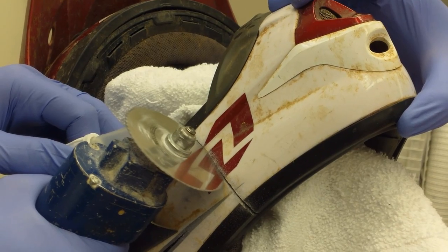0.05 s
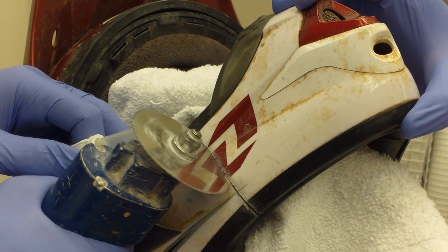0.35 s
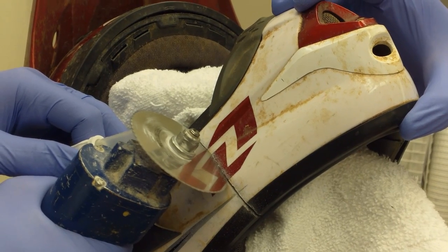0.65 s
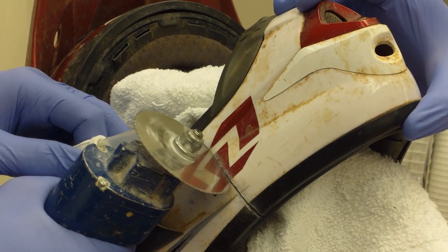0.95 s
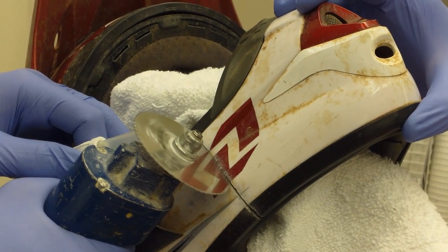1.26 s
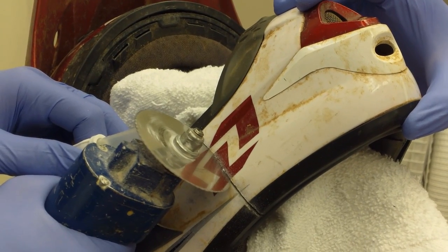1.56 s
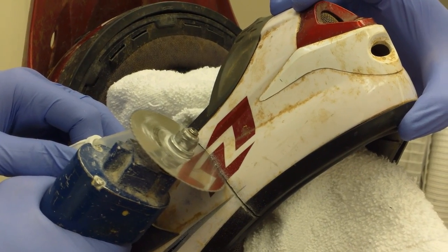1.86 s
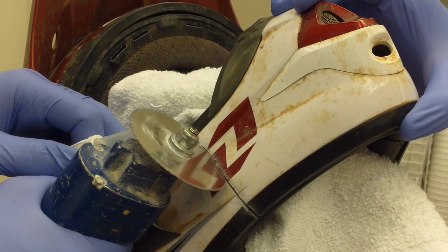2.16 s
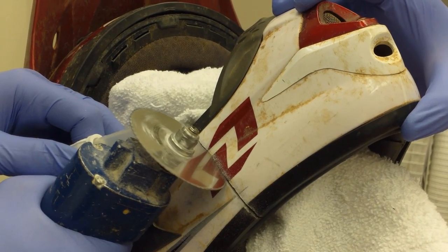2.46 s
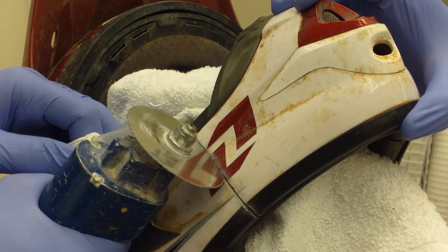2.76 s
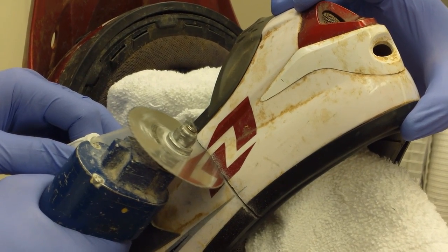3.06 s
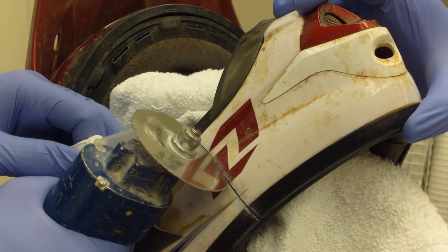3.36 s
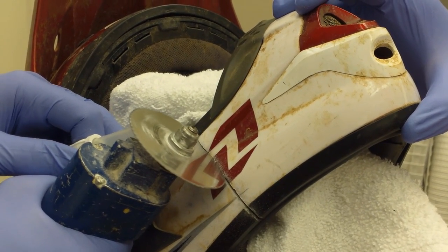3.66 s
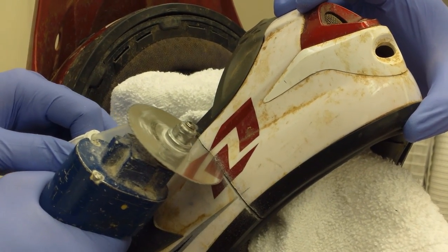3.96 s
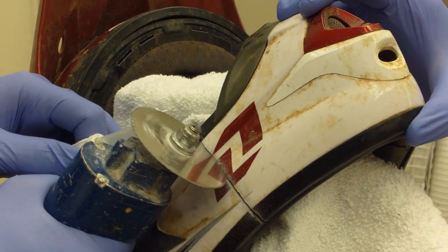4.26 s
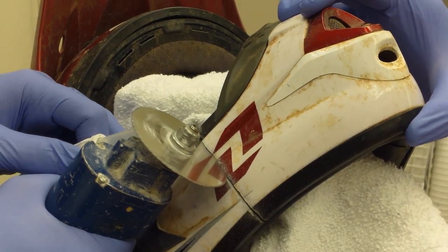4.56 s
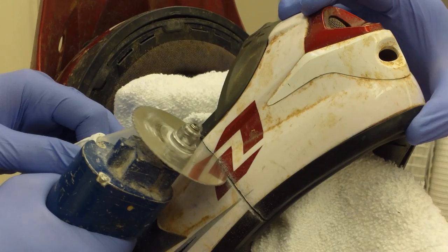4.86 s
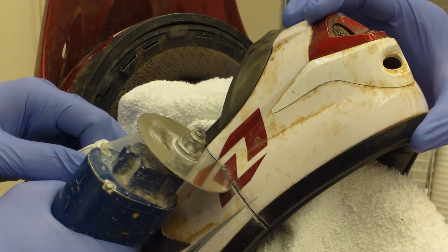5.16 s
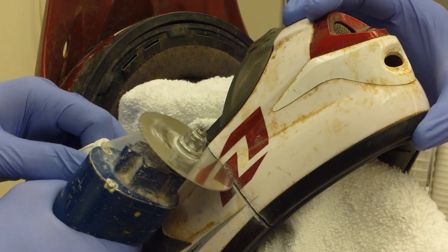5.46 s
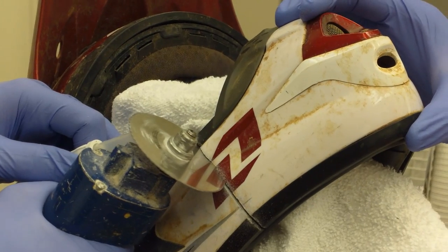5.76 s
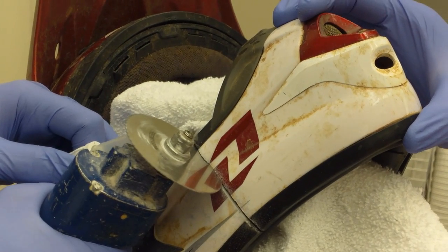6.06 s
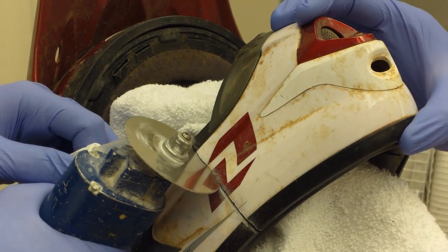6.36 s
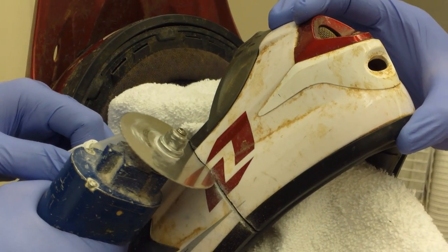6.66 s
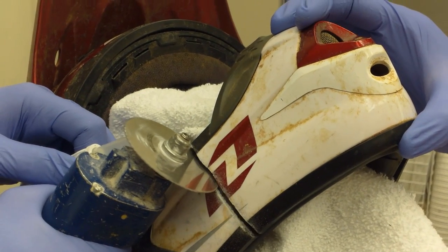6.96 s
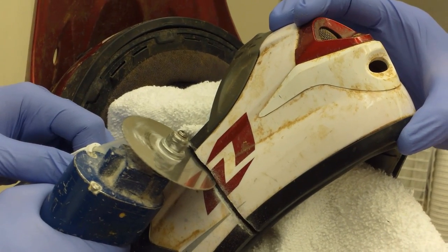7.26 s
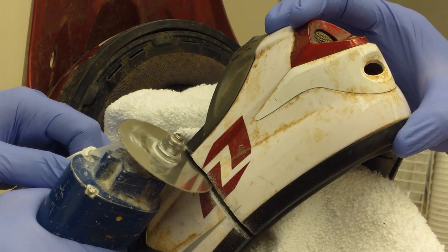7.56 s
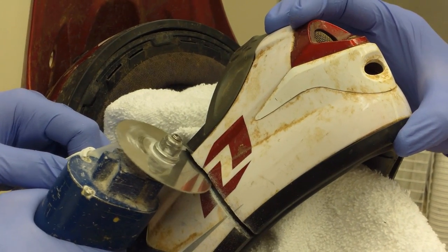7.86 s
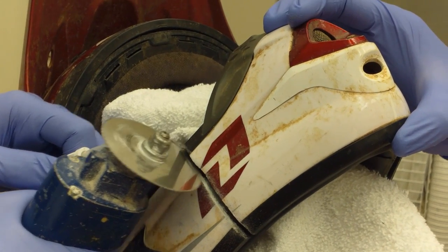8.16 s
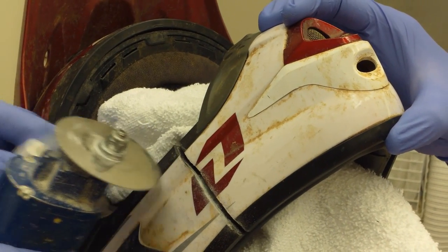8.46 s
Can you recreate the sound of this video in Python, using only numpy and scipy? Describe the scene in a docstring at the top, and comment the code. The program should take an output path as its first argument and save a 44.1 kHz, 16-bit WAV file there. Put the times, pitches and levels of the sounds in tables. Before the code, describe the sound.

A small electric saw whines steadily as its thin steel disc rasps through a hard plastic shell, squealing now and then.

```python
"""A small room, the microphone close to a small electric saw cutting through a hard plastic shell.
The thin steel disc knocks on the cut once a turn, which makes a whine and sets the shell droning.
Its teeth rasp, the chips hiss, and the steel rings and now and then squeals where it binds.
The motor sags under load and speeds up as the disc comes free; near the end the hand bumps the saw.
Mains hum and the low rumble of the room lie underneath."""
import sys
import numpy as np
from scipy import signal
from scipy.fft import rfft, irfft
from scipy.io import wavfile
from scipy.ndimage import uniform_filter1d

SR = 44100
rng = np.random.default_rng(int(sys.argv[2]) if len(sys.argv) > 2 else 0)


def wav_out(sig):
    """Save sig, one row per channel (or a flat mono array), as 16-bit PCM at SR to the path in sys.argv[1]."""
    wavfile.write(sys.argv[1], SR, np.round(np.clip(np.atleast_2d(sig).T, -1, 1) * 32767).astype(np.int16))


N = 383669
TIME = np.arange(N) / SR
STEPS = TIME[::64]  # slow controls live on this coarser grid

# The room's rumble. Each row: frequency in Hz, relative level in dB.
RUMBLE_COLOUR = [(20, 4), (45, -1.5), (90, -9), (180, -35), (400, -9), (1500, -29)]
# The hand shifts its hold. Each row: centre in seconds, half-length in seconds, level in dB.
HAND_BUMPS = [(8.08, .05, -53), (8.25, 0.065, -51), (8.58, .04, -54)]
# Speed of the shaft. Each row: time in seconds, turns a second.
SHAFT_SPEED = [(0.0, 299.9), (0.22, 298.1), (2.35, 297.0), (2.59, 296.2), (3.56, 296.6), (3.83, 297.9),
               (4.38, 306.2), (4.56, 304.8), (4.94, 296.7), (5.4, 292.3), (5.77, 290.6), (6.3, 296.7),
               (6.54, 297.2), (6.69, 296.6), (7.17, 299.5), (7.46, 309.6), (8.0, 315.7), (8.7, 320.6)]
# How firmly the disc bites. Each row: time in seconds, bite in dB (0 is firm, lower is freer).
DISC_BITE = [(0, 0), (.75, -0.4), (1.15, 0.8), (1.62, 0.8), (1.75, -1.8), (2.15, -2), (2.5, -0.14),
             (3.55, -1.9), (3.8, -2.1), (4.1, -1.5), (4.75, -1.4), (5.2, -0.8), (5.7, 0.1), (5.98, -2),
             (6.62, -1.4), (7.1, -3.2), (7.4, -6.5), (8.7, -6)]
# The motor's fundamental and its octave. Each row: time in seconds, level in dB.
MOTOR_FUNDAMENTAL = [(0.0, -38), (2.01, -47.5), (3.2, -45), (3.58, -51), (4.07, -36), (4.84, -36.5),
                     (5.28, -63), (5.43, -44), (6.18, -50), (6.37, -42), (7.22, -39.5), (7.34, -47),
                     (8.65, -50.5), (8.7, -54)]
MOTOR_OCTAVE = [(0.0, -43), (0.56, -47), (3.71, -47.5), (3.78, -56), (4.41, -39), (5.99, -42), (6.23, -36),
                (7.03, -39), (7.22, -52.5), (8.7, -41)]
# Shell resonances, each fed by one shaft order. Each row: order, frequency in Hz, width in Hz,
# level in dB at a firm bite, dB per dB of bite, dB per second of cutting, sway in dB.
DRONE_MODES = [(4, 1188, 110, -30, 3, 0.38, 2.5), (5, 1490, 190, -39, 0.04, -0.58, 1),
               (6, 1790, 79, -32.5, .5, -0.7, 2), (14, 4160, 160, -29, -0.05, -0.16, 1.6)]
# The disc skips in the cut. Each row: centre in seconds, half-length in seconds, dip in dB.
DISC_SKIPS = [(3.284, 0.026, 3), (4.04, 0.019, 20), (6.723, 0.011, 19)]
# Colour of the other shaft orders. Each row: frequency in Hz, relative level in dB.
WHINE_COLOUR = [(900, -42), (2100, -40.5), (3000, -37), (3300, -42), (3900, -34), (4500, -38), (5100, -36),
                (5650, -31), (6000, -44), (7100, -38), (7600, -49.5), (8700, -37.5), (10300, -42),
                (12300, -56)]
# A shell resonance moves as the cut lengthens. Each row: time in seconds, frequency in Hz, lift in dB.
MOVING_MODE = [(0, 3000, -2.5), (1.1, 3120, 0), (1.7, 2080, 6.5), (2.7, 2050, 6.5), (3.25, 3300, 2.5),
               (3.6, 2450, 3.5), (4.3, 3100, 1.5), (5.7, 2310, 0.5), (6.2, 1990, -2), (6.6, 2000, 1),
               (6.71, 2190, 13), (6.82, 2480, 1), (7.0, 2560, 7), (7.08, 2180, 5), (7.33, 2300, -7),
               (7.5, 2380, 6), (7.85, 2950, 6.5), (8.7, 3170, 7.5)]
# Noise of the shell, the teeth and the chips. Each row: frequency in Hz, relative level in dB.
RATTLE_COLOUR = [(150, -17), (420, -2), (650, 0), (880, 10.5), (1200, 8), (1600, 1.5), (2200, -17.5),
                 (3200, 1.5), (6000, -51)]
RASP_COLOUR = [(700, -38.5), (1500, -12), (2100, -3.5), (2900, -5), (3400, -4.5), (4000, 3), (4600, 4),
               (5400, 0.5), (6500, -9.5), (9000, -46.5)]
HISS_COLOUR = [(3500, -21), (5600, -5.5), (6300, -1.5), (7100, -2.5), (7600, -6.5), (8300, 1.5),
               (9400, 2.5), (10200, -1), (11200, -7.5), (12300, -6.5), (13300, -10.5), (14600, 0),
               (15400, -7), (15700, -1.5)]
# Stick-slip of disc and shell. Each row: start and end in seconds, nominal pitch in Hz, level in dB.
STICK_SLIPS = [(0, .36, 5085, -33), (0.45, 0.567, 3573, -27), (.474, .81, 6560, -27),
               (.476, .817, 5358, -27), (.48, 1.1, 8925, -30), (1.11, 1.703, 1487, -32),
               (1.3, 3.5, 11580, -40), (1.92, 2.3, 1782, -32), (3.0, 3.6, 1782, -33),
               (3.33, 3.784, 1483, -30), (3.4, 3.9, 4160, -32), (3.78, 4.135, 1795, -26),
               (3.853, 3.951, 3575, -26.5), (4.205, 4.95, 1820, -31), (4.457, 4.798, 1520, -33),
               (5.285, 5.62, 5255, -20.5), (5.346, 5.802, 6110, -29), (5.503, 5.895, 2330, -33),
               (5.72, 5.9, 1455, -31), (5.93, 6.5, 4130, -31), (6.066, 6.7, 1485, -30),
               (6.15, 6.7, 1782, -30.5), (7.262, 7.37, 5160, -13.5), (7.36, 7.427, 8500, -26),
               (7.442, 7.71, 4060, -26), (7.548, 7.7, 5170, -13.5), (7.774, 7.81, 5200, -12.5),
               (7.896, 7.962, 5100, -14.5), (8.33, 8.47, 8440, -22)]
# The disc's low ring and its high ring. Each row: time in seconds, relative level in dB.
LOW_RING = [(0, -20.5), (.25, -19.5), (.75, -27), (.93, -20.5), (1.2, -22), (1.75, -21), (2.15, -23.5),
            (3.1, -21), (4.0, -19.5), (4.3, -21.5), (5.4, -19.5), (7.1, -19), (8.2, -19.5), (8.7, -16)]
HIGH_RING = [(0, -31), (2.1, -30), (3.0, -26.5), (3.7, -28), (4.15, -23), (4.5, -24), (4.8, -30),
             (6.0, -27), (6.65, -30), (7.4, -22), (8.2, -21), (8.42, -24), (8.7, -20)]

HUM_HZ = 120
LOW_MODE_HZ, LOW_RISE_HZ_PER_S = 5105, 7  # the disc's low mode rises as the cut lengthens
HIGH_MODE_HZ, HIGH_SHIFT_HZ_PER_DB = 14540, 42  # its high mode stiffens with the bite


def amp(db):
    """Decibels to gain."""
    return 10 ** (np.asarray(db) / 20)


def unit_rms(x):
    """Scales to rms 1."""
    return x / np.sqrt(np.mean(x ** 2) + 1e-20)


def curves(rows):
    """Each column of a table, joined by straight lines in time."""
    seconds, *columns = np.transpose(rows)
    return [np.interp(TIME, seconds, column) for column in columns]


def sway(hz):
    """Slow random motion of rms 1 on the coarse grid, rolling off above hz."""
    f = np.fft.rfftfreq(8192, STEPS[1])
    slow = irfft(rfft(rng.standard_normal(8192)) / (1 + (f / hz) ** 4))
    return unit_rms(slow[:len(STEPS)])


def wander(hz):
    """A sway drawn out to every sample."""
    return np.interp(TIME, STEPS, sway(hz))


def spectrum(points, f):
    """Reads a colour in dB at the frequencies f."""
    hz, db = np.transpose(points)
    return np.interp(np.log(f + 1), np.log(hz), db)


def colour(x, points):
    """A causal filter with the given spectrum; the result has rms 1."""
    log_gain = np.log(amp(spectrum(points, abs(np.fft.fftfreq(4096, 1 / SR)))))
    taps = np.fft.ifft(np.exp(np.conj(signal.hilbert(log_gain)))).real  # minimum phase
    return unit_rms(signal.oaconvolve(x, taps[:len(taps) // 2])[:N])


def resonate(x, hz, width_hz):
    """A resonance that follows the curve hz; the result has rms 1."""
    carrier = np.exp(2j * np.pi * np.cumsum(hz) / SR)
    pole = np.exp(-np.pi * width_hz / SR)
    return unit_rms((carrier * signal.lfilter([1 - pole], [1, -pole], x / carrier)).real)


def level(bite_db, db, grip, growth=0):
    """Gain of a layer: db at a firm bite, grip dB per dB of bite, growth dB a second of cutting."""
    return amp(db + grip * bite_db + growth * TIME)


def order_angle(order, turns, twist_rad=1.2):
    """The phase of one shaft order after the shell, which delays the orders unequally."""
    return 2 * np.pi * order * turns + twist_rad * order ** 2


def room_tone(hum_db=-51.5, rumble_db=-54):
    """Behind the saw: mains hum over the low rumble of the room."""
    hum = amp(hum_db) * np.sqrt(2) * np.sin(2 * np.pi * HUM_HZ * TIME)
    return hum + amp(rumble_db) * colour(rng.standard_normal(N), RUMBLE_COLOUR)


def wall_reflections(x, t60_s=0.22):
    """Sparse reflections reach the microphone from near walls and die quickly."""
    t = TIME[:SR // 3]
    taps = rng.standard_normal(len(t)) * (rng.random(len(t)) < 2000 / SR)  # about 2000 a second
    taps *= (t > .003) * amp(-60 * t / t60_s)
    return signal.oaconvolve(x, taps / np.linalg.norm(taps))[:N]


def hand_bumps(hz=98):
    """Dull thuds of the hand on the saw."""
    size = sum(amp(db) * np.exp(-((TIME - s) / length) ** 2) for s, length, db in HAND_BUMPS)
    pitch = np.full(N, hz)
    thud = resonate(rng.standard_normal(N), pitch, width_hz=25)
    return size * resonate(thud, pitch, width_hz=60)


def motor(turns):
    """The motor's own hum: the shaft rate and its octave."""
    (fundamental_db,), (octave_db,) = curves(MOTOR_FUNDAMENTAL), curves(MOTOR_OCTAVE)
    phase = rng.random(2)
    fundamental = amp(fundamental_db) * np.cos(2 * np.pi * (turns + phase[0]))
    octave = amp(octave_db) * np.cos(2 * np.pi * (2 * turns + phase[1]))
    return np.sqrt(2) * (fundamental + octave)


def shell_drone(turns, speed_hz, bite_db):
    """Strong shaft orders swell near the shell's resonances and break off where the disc skips."""
    gap_db = sum(depth * np.exp(-((TIME - s) / length) ** 2) for s, length, depth in DISC_SKIPS)
    out = np.zeros(N)
    for order, hz, width, db, grip, growth, sway_db in DRONE_MODES:
        nearness = 1 / np.hypot(1, 2 * (round(order) * speed_hz - hz) / width)
        size = nearness * level(bite_db, db, grip, growth) * amp(sway_db * wander(3.9))
        out += size * np.cos(order_angle(round(order), turns))
    return np.sqrt(2) * amp(-gap_db) * out


def tooth_whine(turns, speed_hz, bite_db, fade_db=1.87, drift_rad=0.74, half_width_hz=240):
    """A high tooth knocks once a turn: a stack of orders that fade in and out as the contact shifts."""
    speed_hz, mode_hz, lift_db = (np.interp(STEPS, TIME, c) for c in (speed_hz, *curves(MOVING_MODE)))
    judder = 0.0066 * wander(42)  # the shaft judders, which blurs the high orders most
    angle = (2 * np.pi * turns + judder) % (2 * np.pi)
    drone_orders = [round(row[0]) for row in DRONE_MODES]
    out = np.zeros(N)
    for order in np.setdiff1d(np.arange(3, 40), drone_orders):
        hz = order * speed_hz
        resonance_db = lift_db / (1 + ((hz - mode_hz) / half_width_hz) ** 2)
        size = amp(spectrum(WHINE_COLOUR, hz) + resonance_db + fade_db * sway(4.1))
        dispersion = np.pi * 0.00703 * order ** 2  # the shell carries treble faster than bass
        phase = dispersion + drift_rad * sway(1.9)
        out += np.interp(TIME, STEPS, size) * np.cos(order * angle + np.interp(TIME, STEPS, phase))
    uneven = 1 + 0.06 * wander(84)  # no two knocks are alike
    ripple = 1 + 0.041 * np.cos(np.pi * HUM_HZ * TIME)  # mains ripple gives them side tones
    return np.sqrt(2) * out * amp(bite_db) * uneven * ripple


def squeals(turns, bite_db, waver_hz=12, flicker_db=2.2, ramp_s=0.021, lock_bite_db=-4):
    """Where the disc binds, a mode sings briefly; a firm bite pulls it onto the nearest shaft order."""
    out = np.zeros(N)
    drift = np.cumsum(waver_hz * wander(77)) / SR
    sputter_db_per_khz = 0.3573 * wander(28)  # the higher the squeal, the more easily it breaks up
    for start, end, hz, db in STICK_SLIPS:
        on = (TIME > start) & (TIME < end)
        gate = np.clip(np.minimum(TIME[on] - start, end - TIME[on]) / ramp_s, 0, 1)
        order = round(hz / (SR * np.diff(turns[on]).mean()))
        locked = bite_db[on].mean() > lock_bite_db
        angle = order_angle(order, turns[on]) if locked else 2 * np.pi * (hz * TIME[on] + drift[on])
        out[on] += amp(db + sputter_db_per_khz[on] * hz / 1000) * gate * np.sin(angle)
    return out * amp(flicker_db * wander(7.8))


def scrape(turns, once_db, twice_db, lag_turns, grit_db):
    """Noise of teeth in plastic; the disc runs out of true, so it presses once and twice a turn."""
    angle = 2 * np.pi * (turns - lag_turns)
    pressure_db = once_db * np.cos(angle) + twice_db * np.cos(2 * angle) + grit_db * wander(900)
    return amp(pressure_db) * rng.standard_normal(N)


def cutting(turns, bite_db, surge_db=0.72, surge_hz=3, rattle_sway_db=1.35):
    """The shell rattles and the teeth rasp with the bite; the chips hiss throughout."""
    shell = scrape(turns, once_db=1.2, twice_db=1, lag_turns=0.062, grit_db=0.69)
    teeth = scrape(turns, once_db=0.6, twice_db=0.29, lag_turns=-0.11, grit_db=0.45)
    chips = scrape(turns, once_db=1.3, twice_db=0.87, lag_turns=-0.09, grit_db=2.1)
    rattle = level(bite_db, db=-39.5, grip=1.0, growth=0.27) * colour(shell, RATTLE_COLOUR)
    rattle *= amp(rattle_sway_db * wander(surge_hz))
    rasp = level(bite_db, db=-25.5, grip=0.15) * colour(teeth, RASP_COLOUR)
    hiss = level(bite_db, db=-22.0, grip=-0.41, growth=-0.14) * colour(chips, HISS_COLOUR)
    return (rattle + rasp + hiss) * amp(surge_db * wander(surge_hz))


def disc_ring(turns, bite_db, low_trim_db=-1, high_trim_db=-2, low_sway_hz=45):
    """The teeth keep two modes of the steel ringing; the lower one sways with the grip of the cut."""
    (low_db,), (high_db,) = curves(LOW_RING), curves(HIGH_RING)
    low_hz = LOW_MODE_HZ + LOW_RISE_HZ_PER_S * TIME
    high_hz = HIGH_MODE_HZ + HIGH_SHIFT_HZ_PER_DB * bite_db
    drive = scrape(turns, once_db=0.62, twice_db=2.8, lag_turns=0.22, grit_db=1.8)
    free = resonate(drive, low_hz + low_sway_hz * wander(30), width_hz=150)
    free = resonate(free, low_hz, width_hz=760)
    swing = np.sqrt(abs(uniform_filter1d(free ** 2, size=700)) + 1e-6)
    free = unit_rms(free / swing ** 0.66)  # friction holds back the widest swings
    near_orders = sum(np.cos(2 * np.pi * order * turns) for order in range(16, 20))
    forced = resonate(near_orders, low_hz, width_hz=280)
    share = np.clip(0.33 * amp(bite_db) ** 2, 0, .9)  # a firm bite locks part of the ring to the shaft
    low_mode = np.sqrt(1 - share) * free + np.sqrt(share) * forced
    high_mode = resonate(resonate(drive, high_hz, width_hz=480), high_hz, width_hz=900)
    return amp(low_db + low_trim_db) * low_mode + amp(high_db + high_trim_db) * high_mode


def scene(whine_db=1.5, walls_db=-13, chatter_db=0.77):
    """The saw from close by, in mono: one shaft drives every part, and the bite shifts their balance."""
    (speed_hz,), (bite_db,) = curves(SHAFT_SPEED), curves(DISC_BITE)
    turns = np.cumsum(speed_hz + 0.188 * wander(8.7)) / SR
    grinding = cutting(turns, bite_db)
    tones = motor(turns) + shell_drone(turns, speed_hz, bite_db)
    tones += amp(whine_db) * tooth_whine(turns, speed_hz, bite_db)
    tones += squeals(turns, bite_db)
    saw = grinding + amp(walls_db) * wall_reflections(grinding) + disc_ring(turns, bite_db) + tones
    feed = amp(chatter_db * wander(34))  # the hand feeds the saw unevenly
    return (saw * feed + hand_bumps() + room_tone())[None]


def record(dry):
    """The recorder behind the microphone cuts off the highest treble."""
    lowpass = signal.firwin(1023, cutoff=15780, window=("kaiser", 9), fs=SR)
    return signal.oaconvolve(dry, lowpass[None], "same")


dry = scene()
out = record(dry)
wav_out(out)
```